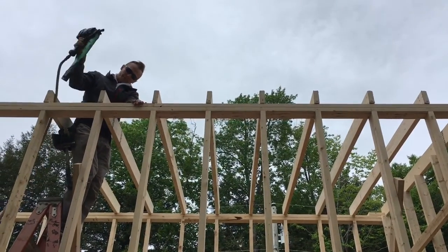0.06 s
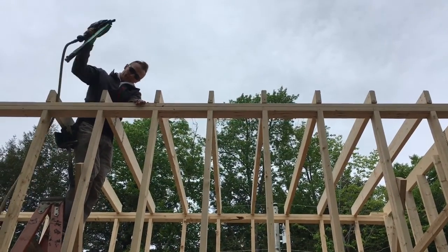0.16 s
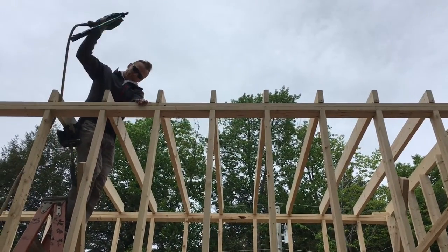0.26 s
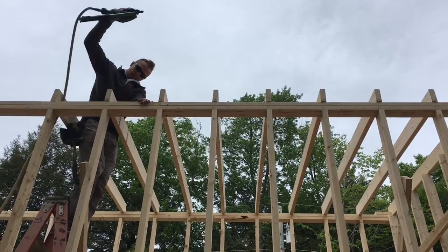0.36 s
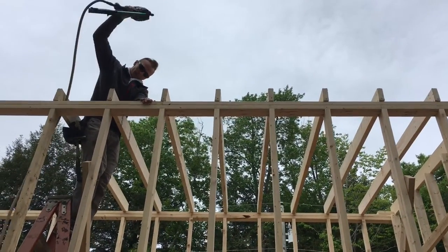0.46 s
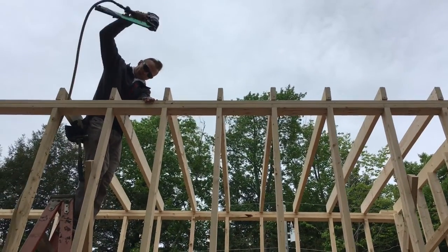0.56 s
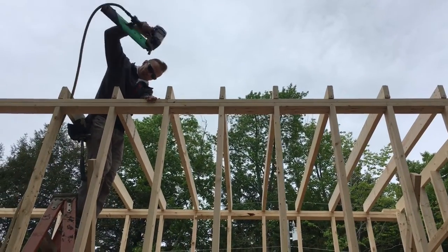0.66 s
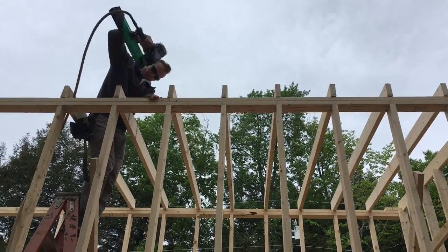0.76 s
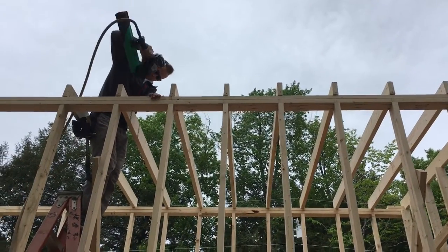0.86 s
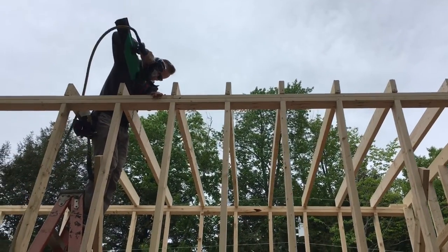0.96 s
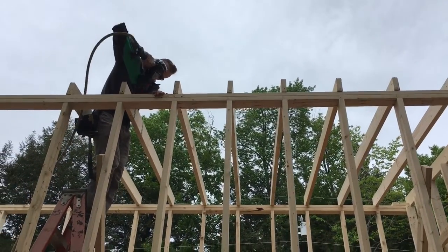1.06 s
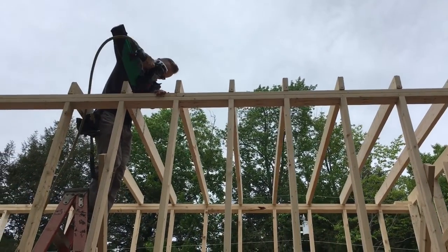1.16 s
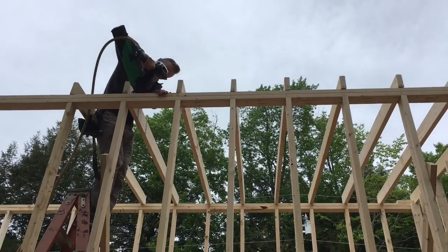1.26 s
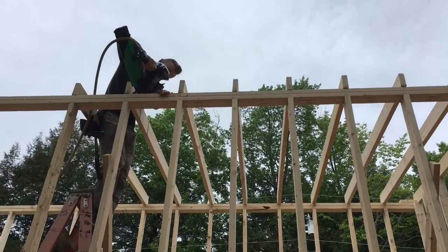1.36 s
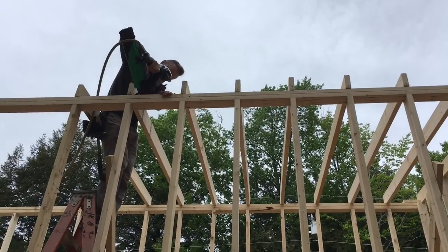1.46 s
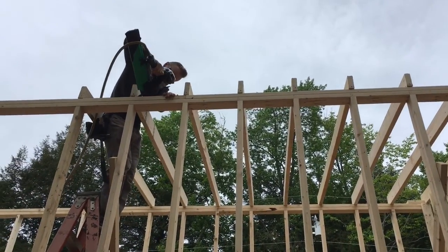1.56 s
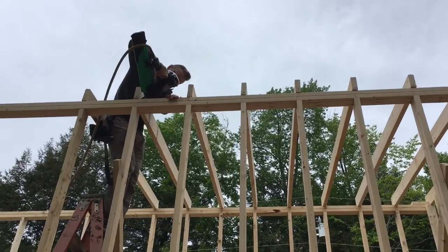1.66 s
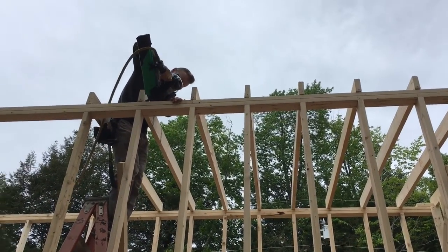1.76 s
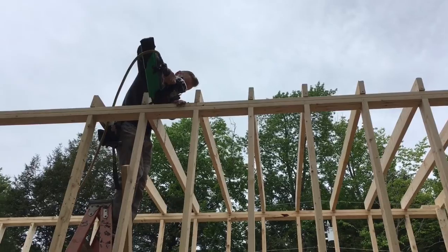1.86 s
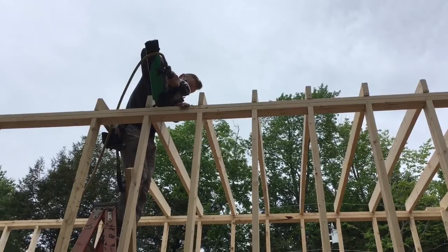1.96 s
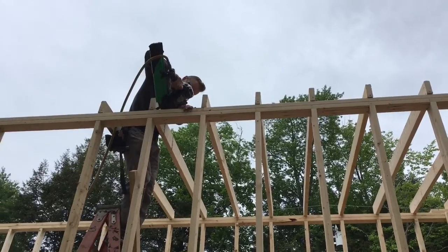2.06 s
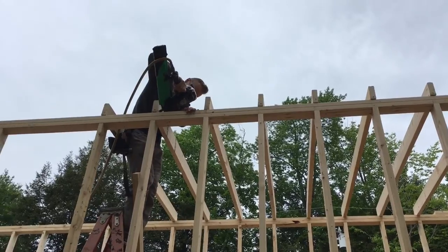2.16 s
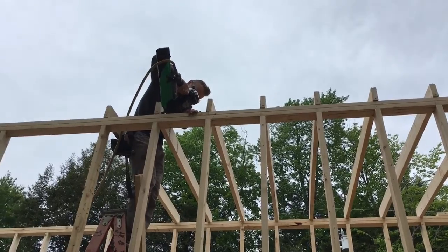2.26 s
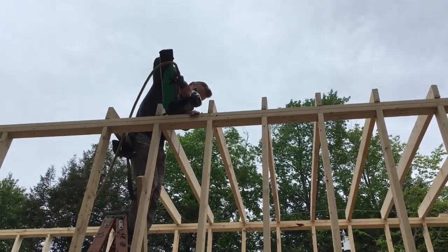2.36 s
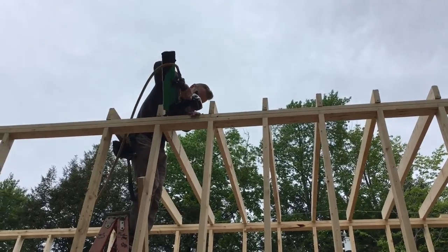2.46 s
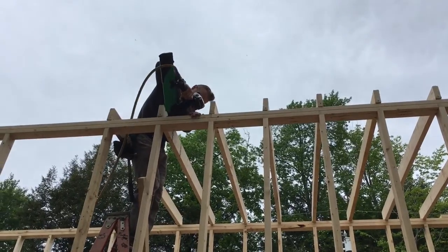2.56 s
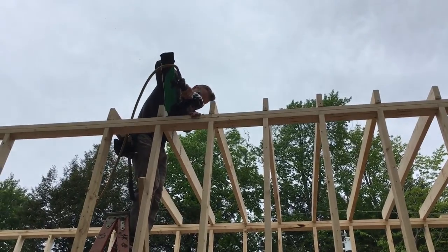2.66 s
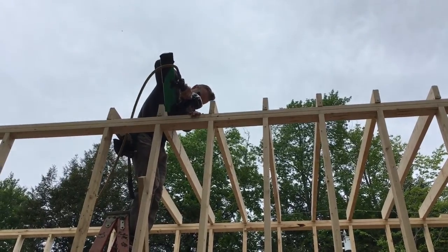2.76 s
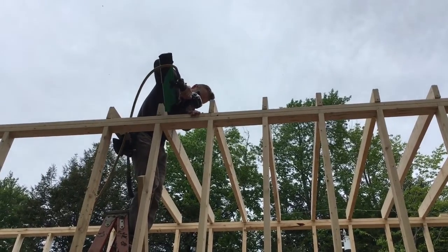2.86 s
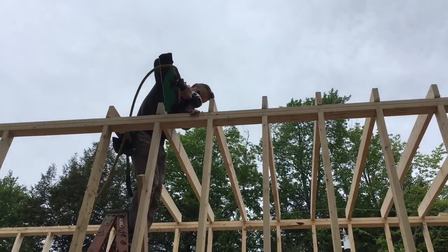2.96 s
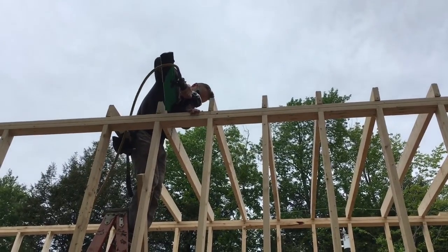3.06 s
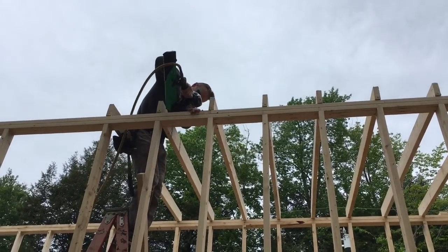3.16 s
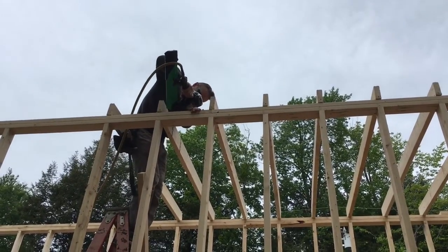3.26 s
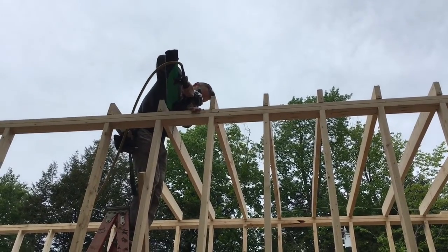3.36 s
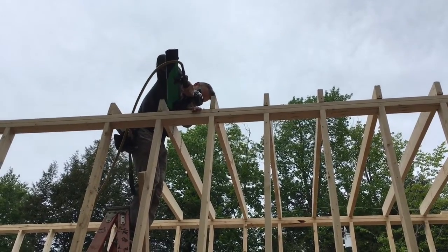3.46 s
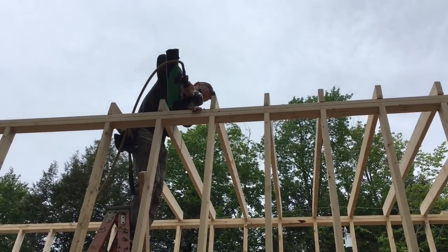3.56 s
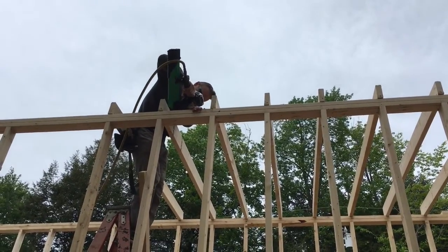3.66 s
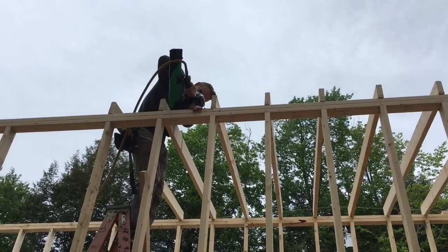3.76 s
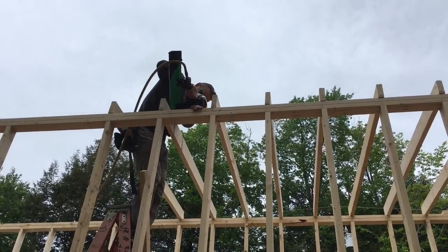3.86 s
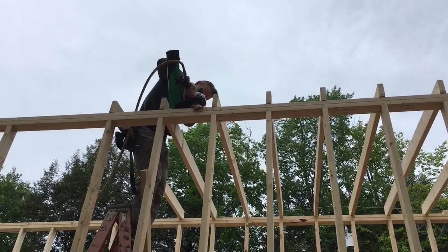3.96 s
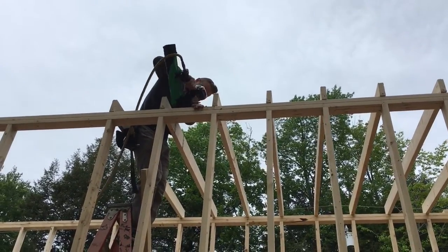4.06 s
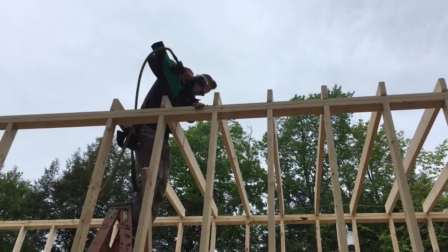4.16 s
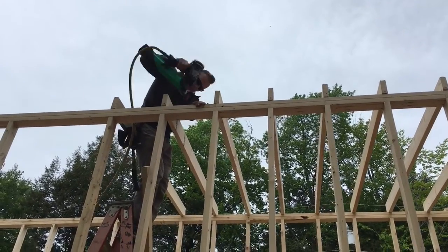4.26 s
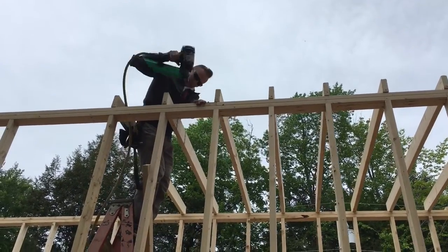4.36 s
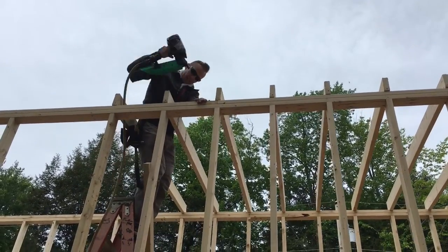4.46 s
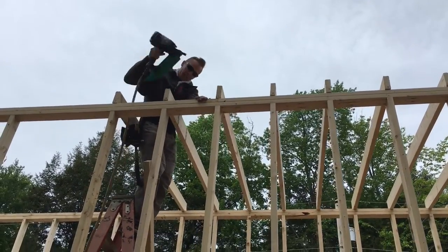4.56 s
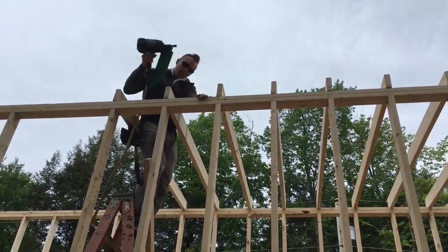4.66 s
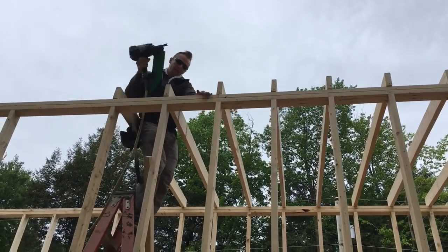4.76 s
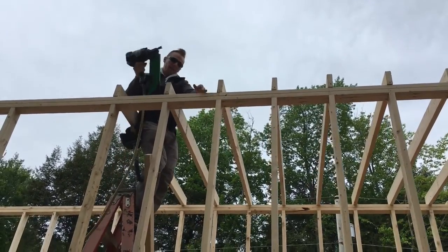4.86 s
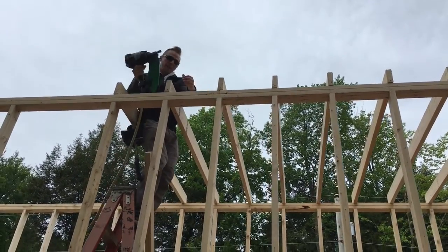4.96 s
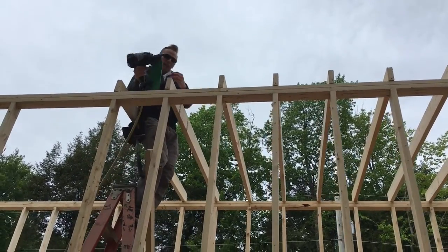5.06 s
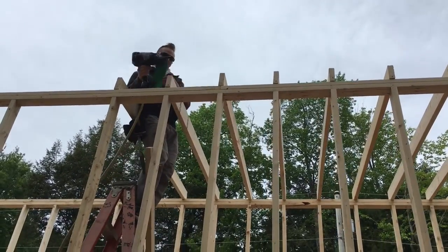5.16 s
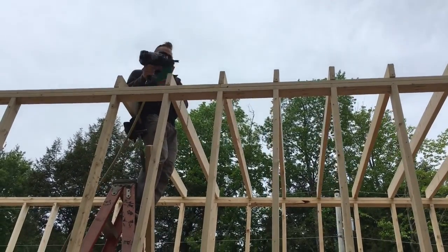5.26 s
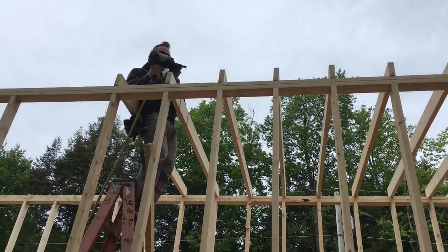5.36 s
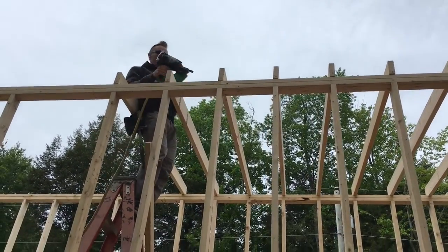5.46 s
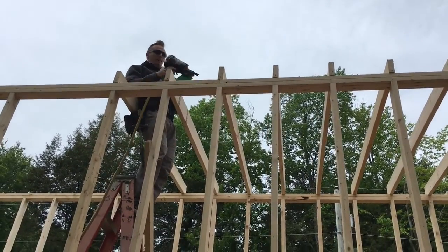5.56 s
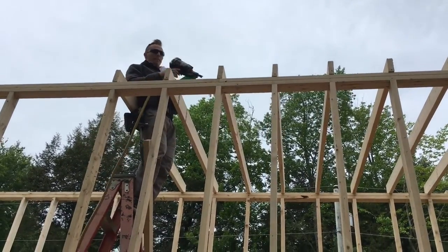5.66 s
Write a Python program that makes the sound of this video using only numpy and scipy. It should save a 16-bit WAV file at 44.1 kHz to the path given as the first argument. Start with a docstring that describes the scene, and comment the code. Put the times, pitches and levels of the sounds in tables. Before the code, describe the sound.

An air nail gun fires two sharp, hissing shots into timber outdoors, with faint knocks, rustling and a small bird around them.

```python
"""An air-powered nail gun at work on a timber roof frame, a few metres above the listener.
First boots and tool bump the frame, clothes rustle, the hose groans and leaks, and the tool slides
along a rafter and taps it. At about 2.6 s and 3.9 s it drives a nail: each shot is a crack, a blast
of air and waves that bend the beams, echoed by the trees. More bumps, clicks and rustling follow.
All along, a small bird calls now and then in the quiet open air."""
import sys
import numpy as np
from scipy import signal
from scipy.fft import rfft, irfft
from scipy.io import wavfile
from scipy.ndimage import uniform_filter1d

SR = 44100
rng = np.random.default_rng(int(sys.argv[2]) if len(sys.argv) > 2 else 0)


def materialize(psi):
    """Save the field psi as 16-bit PCM at rate SR to the path in sys.argv[1].

    A 1-D psi becomes a single channel; in a 2-D psi each row is a channel.
    """
    bounded = np.clip(np.atleast_2d(psi).T, -1, 1)
    quanta = np.round(bounded * 32767).astype(np.int16)
    wavfile.write(sys.argv[1], SR, quanta)


N = 251315
TIME = np.arange(N) / SR
T = TIME[:SR]  # the first second of any one event
HZ = np.maximum(np.arange(SR // 2 + 1), 1.)  # its frequency axis
SHIFT_ATTACK_S, SHIFT_RELEASE_S = 0.05, 0.29  # how the carpenter's movements start and stop

# the shots: t/s, relative level/dB, exhaust length/s, timber boost/dB, thump boost/dB,
# loss along the beams/dB, time from pressing the safety tip to firing/s
SHOTS = [(2.5790, 0.5, 0.042, -0.5, -2, 5.5, .047), (3.9354, 1, 0.045, 0.5, 4.5, 3.5, .0395)]


def shots():
    """Air fills the cylinder, the driver cracks down, the frame booms and the used air blows out."""
    # the driver hits the nail, then the piston hits its bumper: t after firing/s, relative level/dB
    blows = [(0, -4.5), (.0076, -3)]
    # ringing of the housing and driver: f/Hz, level/dB, t60/s (the time to fade by 60 dB)
    tool_modes = [(2360, -29.5, 0.23), (2790, -30, 0.045), (3240, -35.5, 0.071), (3660, -29.5, 0.083),
                  (6000, -28.5, 0.19), (6380, -30, 0.58), (6780, -28.5, 0.19)]
    # tone colour of each part of a shot: f/Hz, level/dB
    crack_colour = [(150, -21), (700, -10), (1700, 2.5), (2800, -8), (5000, -24.5), (16000, -25)]
    exhaust_colour = [(300, -26), (1200, -6), (2300, -3), (4200, -4.5), (6200, -2), (8000, -3),
                      (10500, 0.5), (13000, 3.5), (16000, 2)]
    timber_colour = [(30, -21.5), (70, -4), (135, -4), (200, -7), (300, -4), (380, -2), (450, -10.5),
                     (540, 0.5), (800, -2), (1200, -2.5), (2000, -2), (3500, -11.5), (9000, -27)]
    thump_colour = [(30, -24), (70, -9), (135, -3), (280, -11.5), (550, -17), (1000, -33), (3000, -57)]
    out = np.zeros(N)
    for s, db, exhaust_s, timber_db, thump_db, loss_db, _ in SHOTS:
        valve = undb(-28 - 2200 * T[:SR // 40]) * noise(exhaust_colour, SR // 40)
        add(out, s - .025, valve[::-1])  # reversed, so the hiss grows up to the shot
        for after, blow_db in blows:
            crack = strike(crack_colour, t60=.012, ring_db=-29)
            add(out, s + after, peak(crack, db + blow_db - 12.5))
        # the last blow sets the metal ringing
        add(out, s + blows[-1][0], undb(db - 3.5) * ring(tool_modes, detune=0.0012))
        # the exhaust sputters until the chamber is empty, then dies away
        flow = (1 - 0.31 * np.exp(-T / 0.0013)) * undb(-420 * np.maximum(T - exhaust_s, 0))
        sputter = noise([(60, -6.5), (250, 3), (600, -9), (2000, -49)], SR)
        add(out, s, undb(db - 11 + 0.91 * sputter) * flow * noise(exhaust_colour, SR))
        # the wood under the tool's nose sounds at once, the rest as the waves reach it
        wood = strike(timber_colour, t60=0.35, ring_db=-1.5)
        add(out, s, peak(wood, db - 20.5, size=900))
        beams = colour(bending(lag_s=.0145, spread=4.5, loss_db=loss_db, count=60), timber_colour)
        add(out, s, peak(beams, db + timber_db - 15, size=1300))
        # the tool kicks back and shoves the beam: a slow, low wave
        thump = colour(bending(lag_s=.0105, spread=2, loss_db=10.5, count=8), thump_colour)
        add(out, s, peak(thump, db + thump_db - 21.5, size=900))
    return out


def bending(lag_s, spread, loss_db, count):
    """Bending waves take many paths through the beams: highs run ahead, lows arrive late."""
    # notes at which the roof frame rings: f/Hz, width/Hz, level/dB
    frame_modes = [(147, 58, -3.5), (257, 75, 5), (560, 68, -8), (1054, 66, 2), (1250, 73, -1),
                   (1475, 54, -4.5), (2300, 63, -4)]
    detour = spread * (np.arange(count) + rng.random(count)) / count  # in lengths of the direct path
    gains = rng.choice([-1, 1], count) * undb(-loss_db * detour)
    cycles = 2 * lag_s * np.sqrt(1000 * HZ)  # the direct path takes lag_s at 1 kHz
    waves = gains @ np.exp(-2j * np.pi * np.outer(1 + detour, cycles).astype(np.float32))
    return irfft(waves * (1 + resonances(frame_modes, HZ)))


def knocks():
    """Boots and tool land and settle, scuffing the wood, shaking the beams and rattling the tool."""
    # bumps: t/s, landing/dB, settling/dB, rattle relative to each/dB, travel time at 1 kHz/s
    bumps = [(0.0, -49, -66, -18, .005), (.428, -43, -47.5, -10, .005), (.595, -39, -40.5, -8.5, .010),
             (.922, -50, -55, -3, 0.0046), (1.099, -48, -42, -17.5, .013),
             (4.7587, -35, -43.5, 2.5, 0.0065), (4.839, -46.5, -59, 0.5, .007),
             (5.176, -49.5, -63, -18, .005), (5.258, -40.5, -47, -21, .019), (5.345, -48, -53, -12, 0.0082)]
    # dull tone of a bump: f/Hz, level/dB
    knock_colour = [(30, -14), (70, 3), (170, -1.5), (300, 2), (650, 5), (1200, -5), (2500, -21),
                    (5000, -31.5), (14000, -43.5)]
    settle_s, loss_db_per_s = 0.037, 700
    out = np.zeros(N)
    for s, land_db, settle_db, rattle_db, travel_s in bumps:
        waves = bending(travel_s, spread=0.039 / travel_s, loss_db=loss_db_per_s * travel_s, count=20)
        beams = colour(waves, knock_colour)
        for at, db in (s, land_db), (s + settle_s, settle_db):
            scuff = colour(rng.standard_normal(SR) * fade(t60=0.096), knock_colour)
            rattle = click(db + rattle_db, tilt_db=-6)
            add(out, at, peak(beams, db, size=500) + peak(scuff, db - 5, size=500) + rattle)
    return out


def handling():
    """The tool's nose taps the wood, its parts click before each shot, and others snap back."""
    # the nose is set against the wood: t/s, relative level/dB, skid t60/s
    taps = [(0.432, -35, 0.18), (0.463, -38.5, 0.042), (1.452, -32.5, .012), (1.513, -41.5, 0.011),
            (2.118, -47, .012), (5.499, -47.5, .012), (5.619, -42.5, 0.016)]
    # trigger and valve: t before firing/s, level/dB, brightness/(dB per octave)
    trigger_clicks = [(.0232, -43.5, -3), (0.01, -41, -4)]
    # trigger and nail strip snap back: t/s, level/dB, brightness/(dB per octave)
    snaps = [(0.4442, -42.5, -4.5), (.4635, -40.5, 7), (0.8757, -52, -0.5), (1.141, -52, -5),
             (1.442, -48.5, -5.5), (2.8945, -33.5, 0), (3.0755, -40, -1), (4.7809, -41.5, -3.5),
             (5.303, -44.5, -4.5), (5.475, -51.5, 3.5), (5.588, -50.5, -1)]
    out = np.zeros(N)
    for s, db, skid_s in taps:
        add(out, s, tap(db, skid_s) + click(db - 15, tilt_db=-1.5))
    for s, *_, lead_s in SHOTS:
        add(out, s - lead_s, click(-48, tilt_db=7.5) + tap(-48.5, skid_s=0.026))  # the safety tip
        for before, db, tilt_db in trigger_clicks:
            add(out, s - before, click(db, tilt_db))
    for s, db, tilt_db in snaps:
        add(out, s, click(db, tilt_db))
        add(out, s + 0.015, click(db - 7.5, tilt_db))  # one bounce
    for s in rng.uniform(1.6, 2.4, size=4):  # faint nudges while the carpenter takes aim
        add(out, s, tap(-57.5, skid_s=.014))
    return out


def tap(db, skid_s):
    """The nose lands on a rafter and skids briefly."""
    # its hollow clack: f/Hz, level/dB, t60/s
    clack_modes = [(680, -9.5, 0.068), (1094, -5.5, 0.022), (1317, 1, 0.064), (1677, -2, .035),
                   (1840, -5, 0.033), (2110, -12, 0.021), (2720, -8.5, 0.049)]
    contact = rng.standard_normal(SR) * fade(skid_s)
    return peak(signal.fftconvolve(contact, ring(clack_modes, detune=0.019))[:SR], db - 6)


def click(db, tilt_db):
    """A small metal part hits its stop; tilt_db brightens it by that much per octave."""
    # tone of the metal: f/Hz, level/dB
    metal_colour = [(200, -20.5), (900, -2.5), (2400, 0.5), (4500, -3.5), (6500, -4.5), (9000, -3),
                    (15000, -4)]
    outline = [(hz, level + tilt_db * np.log2(hz)) for hz, level in metal_colour]
    return peak(strike(outline, t60=0.035, ring_db=-17.5), db)


def hose_groan():
    """The hose groans, rising in pitch as it slides faster over a beam."""
    # tugs on the hose: t/s, length/s, level/dB
    tugs = [(.145, .14, -41), (0.276, 0.063, -45.5), (0.359, 0.079, -45)]
    start_hz, rise_hz_per_s = 292, 350
    pitch = start_hz + rise_hz_per_s * (TIME - tugs[0][0])
    wobble = noise([(40, 3), (120, -12.5), (600, -55)], N)
    phase = 2 * np.pi * np.cumsum(pitch * (1 + 0.052 * wobble)) / SR
    pull = sum(undb(db) * swell(s, length, attack=0.031, release=0.037) for s, length, db in tugs)
    return (np.sin(phase) + undb(-12.5) * np.sin(2 * phase) + undb(-22) * np.sin(3 * phase)) * pull


def hose_leak():
    """Air escapes at the hose's swivel joint as the tool is swung: it starts, weakens and stops."""
    # a thin hiss: f/Hz, level/dB
    hiss_colour = [(2000, -15.5), (9000, -22), (11000, -18), (12200, -3.5), (14000, -9), (16000, -4)]
    start_s, sag_db_per_s = .03, 19.5
    opening = swell(start_s, length=0.79, attack=0.17, release=.09)
    return noise(hiss_colour, N) * opening * undb(-45.5 - sag_db_per_s * (TIME - start_s))


def rustle():
    """Work clothes and hose brush and scrape along the timber while the carpenter shifts."""
    # shifts on the ladder: t/s, length/s, cloth level/dB, scrape level/dB
    shifts = [(-.05, 0.67, -52, -66.5), (0.598, 0.34, -51, -63), (1.097, 0.37, -51.5, -65.5),
              (4.726, 0.7, -59, -62.5), (5.258, 0.31, -49.5, -70)]
    # tone of scraped dry wood: f/Hz, level/dB
    scrape_colour = [(300, -10), (850, 3), (1300, 1), (1500, 2), (1720, 0), (2000, -6.5), (2750, -5),
                     (3300, -5), (4300, -9), (5200, -19), (10000, -8), (16000, -18.5)]
    brushing = scraping = 0
    for s, length, cloth_db, scrape_db in shifts:
        motion = swell(s, length, SHIFT_ATTACK_S, SHIFT_RELEASE_S)
        brushing += undb(cloth_db) * motion
        scraping += undb(scrape_db) * motion
    flutter = noise([(8, 11), (30, 4), (200, -60.5)], N)
    grit = noise([(20, 7), (150, -10), (1000, -28)], N)
    cloth = noise([(30, 2), (70, 12.5), (300, 3.5), (600, -5), (1600, -26.5), (3300, -26),
                   (8000, -31), (16000, -25)], N)
    return cloth * brushing * undb(2 * flutter) + noise(scrape_colour, N) * scraping * undb(2 * grit)


def slide():
    """The tool slides along a rafter, and the gritty rubbing makes it sing thinly."""
    # the notes it sings: f/Hz, width/Hz, level/dB
    slide_modes = [(1616, 68, 4), (2670, 220, -5), (3180, 59, -6), (3520, 71, -4)]
    start_s, length_s, db = 0.728, 0.47, -61
    hz = np.arange(N // 2 + 1) * SR / N
    grit = rng.standard_normal(N) * undb(3 * noise([(20, 0), (150, -5), (1000, -37)], N))
    singing = irfft(rfft(grit) * resonances(slide_modes, hz), N)
    motion = swell(start_s, length_s, SHIFT_ATTACK_S, SHIFT_RELEASE_S)
    return undb(db) * singing / singing.std() * motion


def bird():
    """Each call is a quick, fading row of three whistles that rise and fall in pitch."""
    # calls: t/s, top pitch/Hz, level/dB
    calls = [(.218, 6140, -58), (0.643, 5690, -55), (0.717, 7020, -58.5), (1.643, 5860, -55),
             (1.933, 6140, -57), (2.248, 5810, -54), (4.568, 5370, -59.5), (4.799, 5580, -58),
             (5.02, 6420, -62), (5.556, 5930, -58)]
    base_hz, step_s, step_db = 5000, .029, -3
    out = np.zeros(N)
    arch = 1 - np.linspace(-1, 1, SR // 32) ** 2
    for s, top_hz, db in calls:
        for k in range(3):
            detune, late, force = rng.standard_normal(3)
            hz = (base_hz + (top_hz - base_hz) * arch) * (1 + 0.014 * detune)
            whistle = arch * np.sin(2 * np.pi * np.cumsum(hz) / SR)
            add(out, s + step_s * k + 0.0016 * late, undb(db + step_db * k + 1.3 * force) * whistle)
    return out


def outdoor_echoes(work):
    """Sound bounces back quickly from the framing nearby and slowly from the trees behind."""
    # tone of the echoes: f/Hz, level/dB
    near_colour = [(50, 8), (130, -2), (300, 0.5), (1500, 0.5), (6000, 2), (11000, -2.5), (16000, -7)]
    trees_colour = [(50, 10), (130, -5), (300, -10.5), (700, -3.5), (1500, -5.5), (4000, 0.5), (8000, -1.5),
                    (15000, -17)]
    # how long they last: f/Hz, t60/s
    near_t60 = [(60, 1.2), (140, 0.7), (300, 0.31), (1500, 0.28), (6000, 0.34), (15000, 0.2)]
    trees_t60 = [(60, 2.7), (250, 1.8), (1500, 1.8), (4000, 1.123), (8000, 0.9), (15000, 0.96)]
    near = echoes(work, near_colour, near_t60, build_s=0.017)
    trees = echoes(work, trees_colour, trees_t60, build_s=0.14)
    # the echo paths wander in length, which smears any ringing pitch
    wander_s = .0003 * noise([(25, 0), (50, -12), (120, -70)], N)
    return np.interp(TIME + wander_s, TIME, undb(-12.5) * near + undb(-21.5) * trees)


def through_leaves(song):
    """Part of the song arrives directly, and much of it is scattered by the leaves."""
    # how long its echo lasts: f/Hz, t60/s
    leaves_t60 = [(4000, 1), (8000, .7)]
    return .65 * song + .75 * echoes(song, [(4000, 0), (8000, 0)], leaves_t60, build_s=.008)


def open_air():
    """The steady, low hush of the outdoors."""
    # its tone: f/Hz, level/dB
    air_colour = [(15, -30.5), (25, -2), (64, 0.5), (129, -2.5), (164, -2.5), (209, -11.5), (297, -10.5),
                  (433, -16), (997, -14), (2170, -24), (3630, -25.5), (4870, -32.5), (5730, -27.5),
                  (7700, -34.5), (15500, -27.5)]
    return undb(-59) * noise(air_colour, N)


def echoes(x, points, t60s, build_s, length_s=2):
    """Scattered echoes that swell over about build_s and fade at their own pace in each octave."""
    t = TIME[:length_s * SR]
    spectrum = rfft(rng.standard_normal(len(t)))
    octave = np.log2(np.maximum(np.arange(len(spectrum)) / length_s, 1))
    tail = 0
    for k in np.arange(5, 15):
        band = irfft(spectrum * np.maximum(1 - abs(octave - k), 0))
        tail += band * np.exp(-np.log(1000) * t / on_hz(t60s, 2. ** k))
    tail *= 1 - np.exp(-(t / build_s) ** 2)
    return signal.fftconvolve(x, colour(tail, points) / np.sqrt(np.sum(tail ** 2)))[:N]


def strike(points, t60, ring_db):
    """A hard hit followed by a short, noisy ring."""
    x = undb(ring_db) * rng.standard_normal(SR) * fade(t60)
    x[0] += 1
    return colour(x, points)


def ring(modes, detune):
    """The fading notes (modes) of a struck object, retuned a little at every blow."""
    shifts = 1 + detune * rng.standard_normal(len(modes))
    return sum(undb(db) * fade(t60) * np.sin(2 * np.pi * hz * shift * T)
               for (hz, db, t60), shift in zip(modes, shifts))


def resonances(modes, hz):
    """How an object answers at each frequency: most strongly near its own notes."""
    return sum(undb(db) / (1 + 2j * (hz - centre) / width) for centre, width, db in modes)


def colour(x, points):
    """Shape the tone of x to an outline of (f/Hz, level/dB) points."""
    cepstrum = irfft(np.log(undb(on_hz(points, HZ))))
    cepstrum[1:] *= 2 * (np.arange(1, len(cepstrum)) < SR // 2)  # so nothing rings ahead of a hit
    return signal.fftconvolve(x, irfft(np.exp(rfft(cepstrum))))[:len(x)]


def noise(points, size):
    """Noise with the given tone outline and an average (rms) level of 1."""
    x = colour(rng.standard_normal(size + SR), points)[SR:]
    return x / x.std()


def on_hz(points, hz):
    """Read between (f/Hz, value) points, with octaves evenly spaced."""
    f, value = np.transpose(points)
    return np.interp(np.log(hz), np.log(f), value)


def peak(x, db, size=220):
    """Scale a sound so that its loudest stretch of `size` samples reaches db."""
    return x * undb(db) / np.sqrt(uniform_filter1d(x ** 2, size, mode="constant").max())


def swell(start, length, attack, release):
    """Rise, hold and fall of one movement, all in seconds."""
    return np.clip(np.minimum((TIME - start) / attack, (start + length - TIME) / release), 0, 1)


def fade(t60):
    """Die away by 60 dB every t60 seconds."""
    return undb(-60 * T / t60)


def undb(db):
    """Turn decibels into a gain."""
    return 10 ** (np.asarray(db) / 20)


def add(out, s, x):
    """Mix x in at s seconds."""
    i = max(int(s * SR), 0)
    out[i:i + len(x)] += x[:N - i]


def scene():
    """The work on the roof with its echoes, the bird in the trees and the open air, in mono."""
    work = shots() + knocks() + handling()
    song = bird()
    background = outdoor_echoes(work) + through_leaves(song) + open_air()
    return (work + background + hose_groan() + hose_leak() + rustle() + slide())[None]


def record(dry):
    """The microphone drops the deepest bass and rounds the highest peaks; the top treble is cut."""
    bottom_hz, top_hz, ceiling = 42, 15900, 1.4
    thinned = signal.sosfilt(signal.butter(3, bottom_hz, "highpass", fs=SR, output="sos"), dry)
    rounded = ceiling * np.tanh(thinned / ceiling)
    return signal.sosfilt(signal.ellip(10, .2, 85, top_hz, fs=SR, output="sos"), rounded)


dry = scene()
out = record(dry)
materialize(out)
```